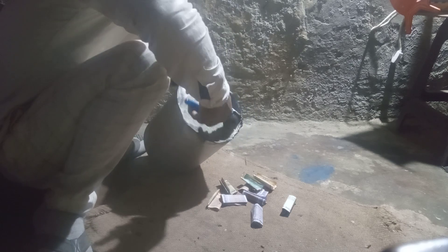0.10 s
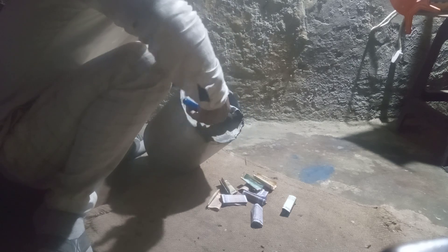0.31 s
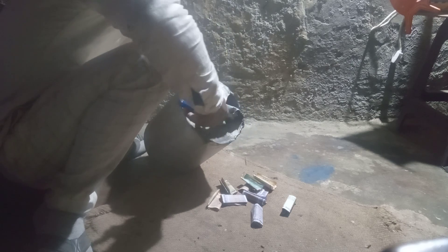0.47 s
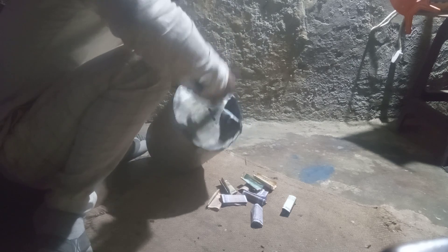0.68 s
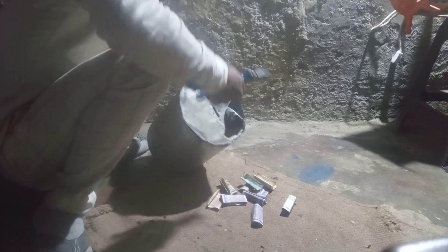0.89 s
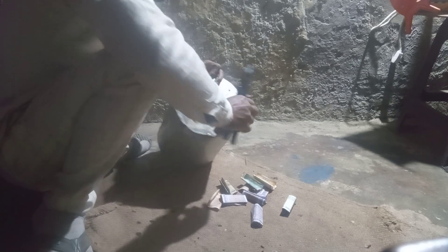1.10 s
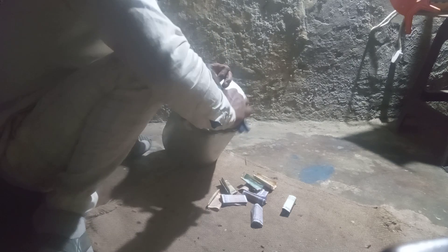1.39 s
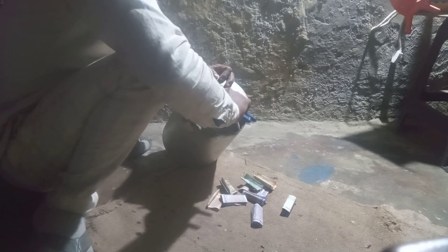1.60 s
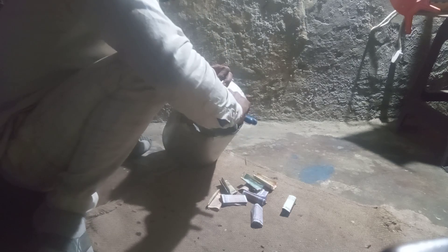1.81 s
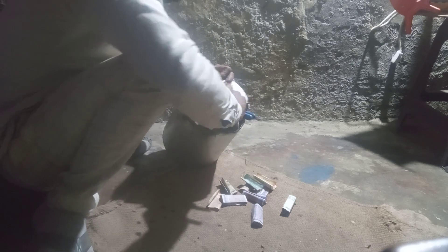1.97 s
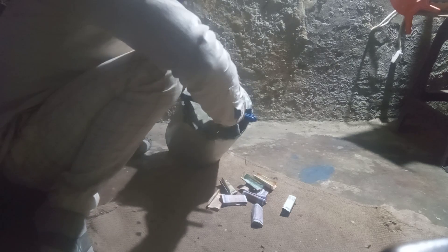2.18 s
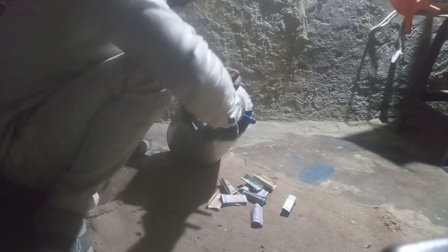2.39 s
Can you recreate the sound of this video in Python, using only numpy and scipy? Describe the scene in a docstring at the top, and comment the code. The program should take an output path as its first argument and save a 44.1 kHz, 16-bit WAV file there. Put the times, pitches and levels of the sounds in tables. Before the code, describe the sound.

Quick runs of sharp, tinny clanks from a tool wrenching a thin metal coin box.

```python
"""In a small, bare room, a thin sheet-metal coin bank is pried and bent open with a hand tool.
Each wrench is a quick run of slips and clanks: the sheet crashes briefly and a few of its modes
ring on, picked out by the bend. The hollow box booms faintly after the hardest wrench.
The tool rubs softly between and after the wrenches, and a fan hums behind it all."""
import sys
import numpy as np
from scipy.fft import rfft, irfft, next_fast_len
from scipy.io import wavfile
from scipy.ndimage import map_coordinates

SR = 44100
rng = np.random.default_rng(int(sys.argv[2]) if len(sys.argv) > 2 else 0)


def generate_wav(signal):
    """Clip the signal to [-1, 1] and save it as 16-bit WAV at the path in sys.argv[1]."""
    frames = np.transpose(np.atleast_2d(signal))
    scaled = np.clip(frames, -1, 1) * 32767
    pcm = np.round(scaled).astype(np.int16)
    wavfile.write(sys.argv[1], SR, pcm)


N = 110250

# Spectrum of the fan's moving air: f/Hz, relative density/dB
FAN_AIR = [(25, -24), (60, -23), (100, -13), (140, -0.5), (230, -1.5), (310, 5.5), (460, -1.5), (750, -3),
           (950, -2.5), (1100, -0.5), (1220, 0.5), (1550, -4.5), (2000, -12.5), (3000, -15.5), (4500, -19),
           (6800, -21.5), (9000, -44.5)]
# Motor and blade tones: f/Hz, relative level/dB
FAN_TONES = [(199.2, -65.5), (274.5, -60.5), (344.5, -60.5), (414.5, -61.5), (506.0, -61), (554.5, -63),
             (699.8, -63.5), (1001, -64), (1200, -61.5), (1486, -68)]
# Tool slipping on the sheet: t/s, level/dB, bass/dB, treble/dB, rise/s, mode lift/dB, favoured f/Hz
SLIPS = [ (0.2206, -29, -5.5, 0, .0008, 5.5, 1480), (.226, -24.5, -3, -1, 0.0059, 14, 334),
         (.256, -27.5, 1, -3, 0.0022, 13.5, 803), (.279, -27, -9.5, 0.5, 0.0081, 14, 190),
         (0.319, -29.5, 3, 0, .005, 15, 191), (.337, -27.5, -1.5, 3, 0.0055, 15.5, 328),
         (.356, -28, -7, -4, 0.0024, 12.5, 195), (0.371, -30, -9.5, -5, 0.0072, 10.5, 720),
         (0.596, -29.5, -7, 0.5, 0.0022, 14, 1360), (.609, -27, 2.5, -3.5, 0.0025, 10, 3284),
         (0.629, -25, 4.5, -8.5, 0.0048, 9, 790), (.664, -27, -1.5, 3, 0.013, 18, 900),
         (0.6931, -19.5, -7, 3.5, 0.00091, 10.5, 826), (0.704, -22.5, -8, 7.5, 0.003, 16, 990),
         (.740, -25.5, -8.5, 3.5, 0.0039, 10.5, 260), (2.078, -31.5, -5, -19, 0.017, 15.5, 189),
         (2.122, -33.5, 1, -0.5, .005, 20.5, 687), (2.133, -27, -12, -10.5, 0.0027, 18, 271.6),
         (2.166, -32, -20, -11, .003, 12.5, 248), (2.191, -41, 0, -2, 0.0049, 12, 1530), ]
# Spectrum of the sheet's dense crash in the room: f/Hz, relative density/dB
CRASH_COLOUR = [(30, -42.5), (70, -47.5), (105, -18), (150, 0), (215, -3.5), (310, 6.5), (450, -0.5),
                (560, -6), (740, 3), (1100, -5), (1450, -1), (2000, -7.5), (2600, -10.5), (3700, -11),
                (4600, -16), (5500, -17.5), (7200, -21.5), (9000, -31)]
# Decay of the crash, band by band: f/Hz, t60/s
CRASH_DECAY = [(60, 0.86), (150, 0.5), (300, 0.42), (700, .26), (1500, 0.25), (3000, 0.23), (7000, 0.17)]
# Modes of the box: f/Hz, relative level/dB
BOX_MODES = [(191, -12.5), (264, -7), (313, -5), (345, -8.5), (635, -9), (725, -8.5), (795, -10.5),
             (862, -14), (938, -4), (975, -11), (1201, -9.5), (1252, -15), (1314, -5.5), (1367, -17),
             (1499, -18), (1533, -12), (1742, -9.5), (1830, -24.5), (1975, -17.5), (2131, -12),
             (2304, -15.5), (2500, -17), (2751, -32.5), (3284, -16), (3881, -35), (5190, -31),
             (6700, -25.5)]
# Decay of the modes: f/Hz, t60/s
MODE_DECAY = [(190, 0.43), (270, 0.39), (330, 0.27), (900, 0.23), (2500, 0.3), (7000, 0.14)]
# Waver of the modes as the sheet flexes: f/Hz, phase depth/rad
MODE_WAVER = [(190, 0.29), (320, 1.27), (950, 1.04), (2500, 1.07), (7000, 1.2)]
# Soft rubs of the tool: t/s, length/s, level/dB, treble/dB, ring/dB, favoured f/Hz
RUB_STROKES = [(1.299, 0.042, -50.5, 4, 2, 1130), (1.384, 0.14, -49.5, -1, -9.5, 854),
               (1.418, 0.078, -56, -13, 1.5, 332), (2.46, 0.066, -46.5, -3, -9, 282)]
# Response of the recorder: f/Hz, gain/dB
RECORDER_EQ = [(20, -27.5), (55, -3), (85, 2), (120, 2.5), (7100, 2.5), (7600, -2), (8000, -14),
               (8400, -28.5)]

AIR_DB, HUM_DB, HUM_WAVER_RAD = -48.5, -0.5, 0.89
BASS_HZ, TREBLE_HZ, TOP_HZ = 433, 2360, 8450  # two shelf corners and the recorder's band limit
SHARED_POWER = 0.59  # share of the fine resonances common to all crashes
GRIT_DB = 1.5  # fast flicker of crashes and rubs
PEAKS_DB, PEAKS_WIDTH_HZ = 4.5, 49.99  # each new shape of the sheet has its own peaks and gaps
RING_DB, MODE_RISE_S, MODE_SCATTER_DB, MODE_BEAT_DB = -4, 0.0047, 1.5, 2.5
LIFT_OCTAVES = 0.11  # reach of the lift around the favoured pitch
BOOM_START_S, BOOM_HZ, BOOM_DB, BOOM_T60_S, BOOM_RISE_S = 0.725, 82, -46.5, 0.81, 0.025
RUB_LIFT_DB = 23.5  # a light touch wakes little but the favoured modes


def amp(db):
    """Decibels to gain."""
    return 10 ** (np.asarray(db) / 20)


def unit(x):
    """Scale to rms 1."""
    return x / np.sqrt(np.mean(x ** 2) + 1e-20)


def along(points, hz):
    """Read a curve of (f/Hz, value) points on a log frequency axis."""
    f, v = np.transpose(points)
    return np.interp(np.log(hz + 1), np.log(f + 1), v)


def random_curve(positions):
    """A smooth curve through random knots, one at each whole number."""
    return map_coordinates(rng.standard_normal(1024), [positions], mode="wrap")


def wobble(rate, size):
    """Smooth random modulation, rate knots a second."""
    coarse = np.arange(0, size + 16, 16)
    return np.interp(np.arange(size), coarse, random_curve(coarse * rate / SR))


def filtered(x, response):
    """EQ x with a gain that is a function of frequency."""
    m = next_fast_len(len(x) + 4096)
    return irfft(rfft(x, m) * response(np.fft.rfftfreq(m, 1 / SR)), m)[:len(x)]


def treble(hz):
    """Shelf from 0 in the bass to 1 in the treble."""
    return 1 - 1 / (1 + (hz / TREBLE_HZ) ** 3)


def add(out, start, x):
    """Mix x into out at start seconds."""
    part = out[round(start * SR):][:len(x)]
    part += x[:len(part)]


def fan():
    """A steady bed of moving air under slightly unsteady motor and blade tones."""
    hum, t = np.zeros(N), np.arange(N) / SR
    air = unit(filtered(rng.standard_normal(N), lambda f: amp(along(FAN_AIR, f))))
    air *= amp(0.14 * wobble(7.33, N))
    for hz, db in FAN_TONES:
        peak = np.sqrt(2) * amp(db + 1.6 * wobble(8.9, N))
        hum += peak * np.sin(2 * np.pi * hz * t + HUM_WAVER_RAD * wobble(12, N))
    return amp(AIR_DB) * air + amp(HUM_DB) * hum


def sheet_crashes():
    """The attack: every slip of the tool gives a gritty crash that dies band by band."""
    out, t = np.zeros(N), np.arange(SR // 2) / SR
    f = np.fft.rfftfreq(len(t), 1 / SR)
    centres, t60s = np.transpose(CRASH_DECAY)
    crossovers = np.array([along(np.c_[centres, row], f) for row in np.eye(len(centres))])
    decays = amp(-60 * t / t60s[:, None])
    colour = unit(amp(along(CRASH_COLOUR, f)))
    bass = 1 / (1 + (f / BASS_HZ) ** 4)
    common = np.sqrt(SHARED_POWER) * rng.standard_normal(len(t))
    for start, db, bass_db, treble_db, rise, _, _ in SLIPS:
        noise = common + np.sqrt(1 - SHARED_POWER) * rng.standard_normal(len(t))
        grit = unit(noise * amp(GRIT_DB * wobble(500, len(t))))
        peaks = unit(amp(PEAKS_DB * (1 - bass) * random_curve(f / PEAKS_WIDTH_HZ)))
        shelves = amp(bass_db * bass + treble_db * treble(f))
        bands = irfft(rfft(grit) * colour * peaks * shelves * crossovers, len(t))
        crash = (bands * decays).sum(0) * (1 - np.exp(-t / rise))
        add(out, start, amp(db) * crash)
    return out


def mode_gains(favoured_hz, lift_db, treble_db):
    """How hard one contact drives each mode; the bend of the sheet lifts those near one pitch."""
    hz, db = np.transpose(BOX_MODES)
    lift = lift_db * np.exp(-0.5 * (np.log2(hz / favoured_hz) / LIFT_OCTAVES) ** 2)
    scatter = MODE_SCATTER_DB * rng.standard_normal(len(hz))
    return amp(db + lift + treble_db * treble(hz) + scatter)


def mode_tone(hz, size):
    """A wavering, beating partial of the flexing sheet; the lowest waver least."""
    waver = along(MODE_WAVER, hz) * wobble(45, size)
    beating = amp(MODE_BEAT_DB * wobble(70, size))
    return beating * np.sin(2 * np.pi * hz * np.arange(size) / SR + waver)


def box_ring():
    """The metallic tail: every slip feeds energy to the modes, and each loses it at its own rate."""
    out, t = np.zeros(N), np.arange(SR * 3 // 4) / SR
    drives = np.array([amp(db) * mode_gains(favoured_hz, lift_db, treble_db)
                       for _, db, _, treble_db, _, lift_db, favoured_hz in SLIPS])
    for (hz, _), gains in zip(BOX_MODES, drives.T):
        envelope = amp(-60 * t / along(MODE_DECAY, hz)) * (1 - np.exp(-t / MODE_RISE_S))
        energy = np.zeros(N)
        for (start, *_), gain in zip(SLIPS, gains):
            add(energy, start, (gain * envelope) ** 2)
        out += np.sqrt(energy) * mode_tone(hz, N)
    return amp(RING_DB) * out


def box_boom():
    """The low end: the hollow box's lowest mode swells after the hardest wrench and hums on faintly."""
    t = np.maximum(np.arange(N) / SR - BOOM_START_S, 0)
    envelope = amp(BOOM_DB - 60 * t / BOOM_T60_S) * (1 - np.exp(-t / BOOM_RISE_S))
    return envelope * np.sin(2 * np.pi * BOOM_HZ * t)


def tool_rubs():
    """The tool drags lightly over the rim: a grainy swell that stirs the box's modes."""
    out, t = np.zeros(N), np.arange(SR // 2) / SR
    for start, length, db, treble_db, ring_db, favoured_hz in RUB_STROKES:
        half = length / 2
        swell = np.minimum(t / half, 1) * np.exp(-np.maximum(t - half, 0) / half)
        grit = rng.standard_normal(len(t)) * amp(GRIT_DB * wobble(250, len(t)))
        scrape = unit(filtered(grit, lambda f: amp(along(CRASH_COLOUR, f) + treble_db * treble(f))))
        gains = mode_gains(favoured_hz, RUB_LIFT_DB, treble_db)
        ring = sum(gain * mode_tone(hz, len(t)) for (hz, _), gain in zip(BOX_MODES, gains))
        add(out, start, amp(db) * swell * (scrape + amp(ring_db) * ring))
    return out


def scene():
    """The box and the tool over the fan, mixed in mono."""
    return (sheet_crashes() + box_ring() + box_boom() + tool_rubs() + fan())[None]


def record(dry):
    """The recorder rolls off the sub-bass and the top, and keeps nothing above its band limit."""
    return np.array([filtered(x, lambda f: amp(along(RECORDER_EQ, f)) * (f < TOP_HZ)) for x in dry])


dry = scene()
out = record(dry)
generate_wav(out)
```